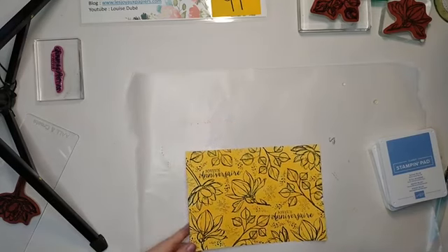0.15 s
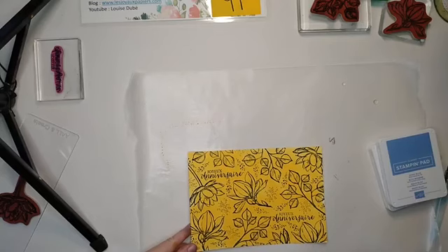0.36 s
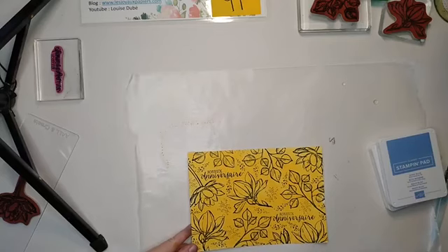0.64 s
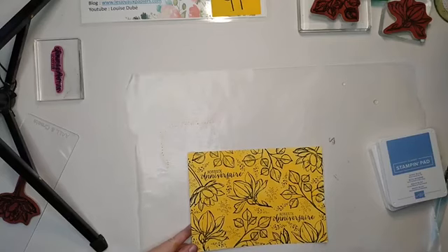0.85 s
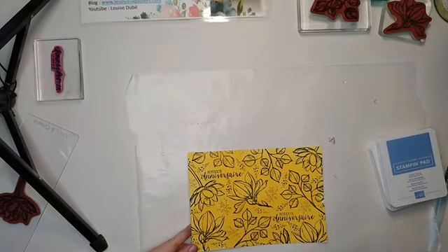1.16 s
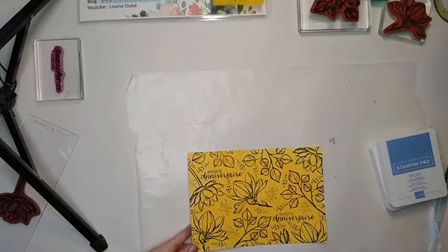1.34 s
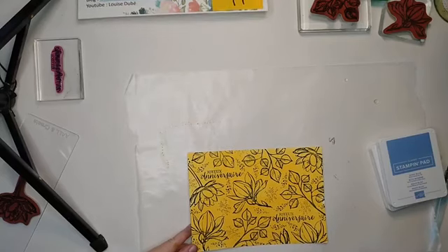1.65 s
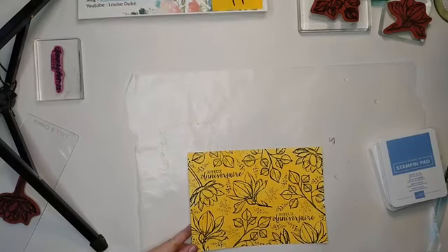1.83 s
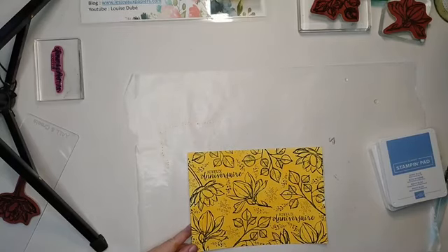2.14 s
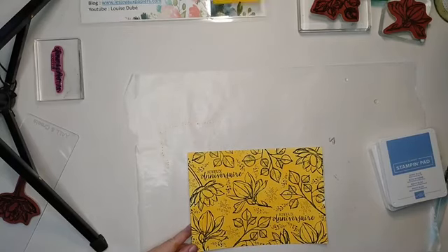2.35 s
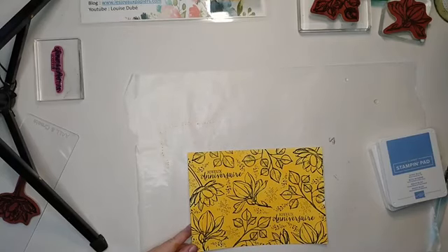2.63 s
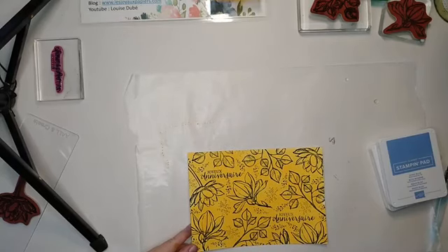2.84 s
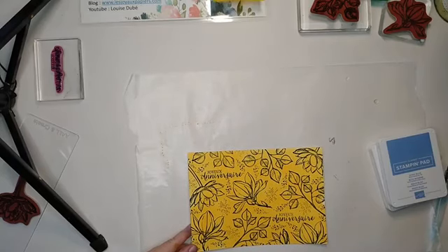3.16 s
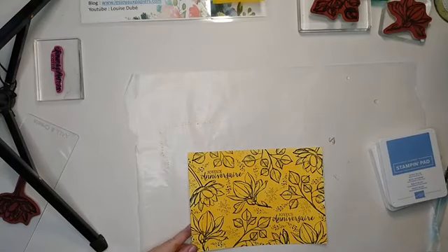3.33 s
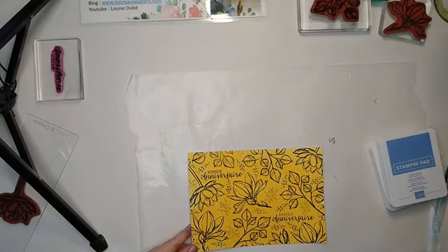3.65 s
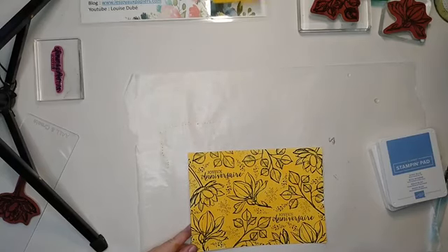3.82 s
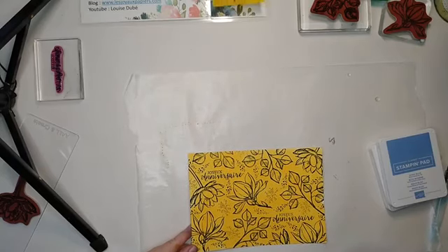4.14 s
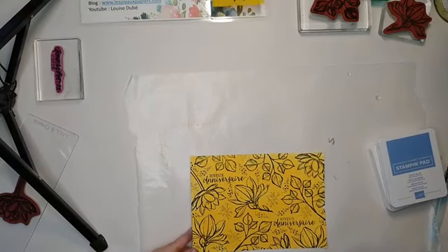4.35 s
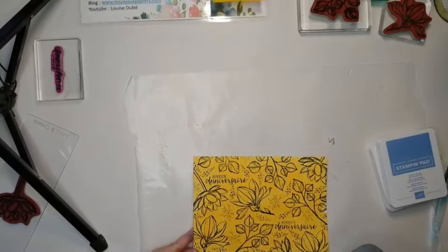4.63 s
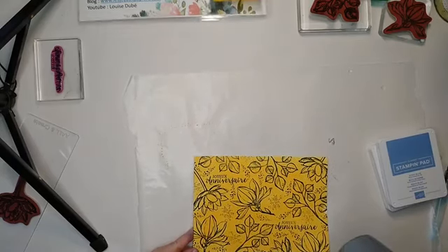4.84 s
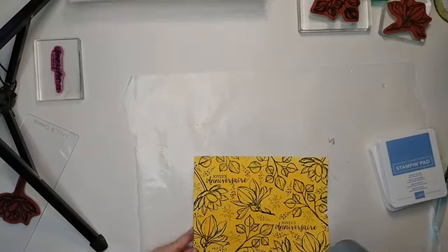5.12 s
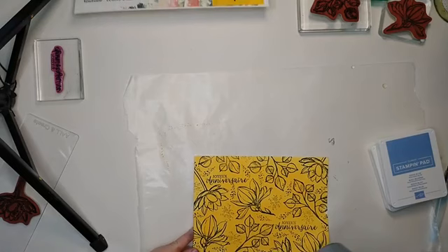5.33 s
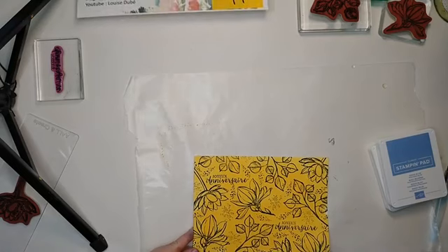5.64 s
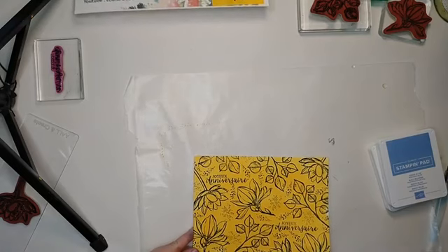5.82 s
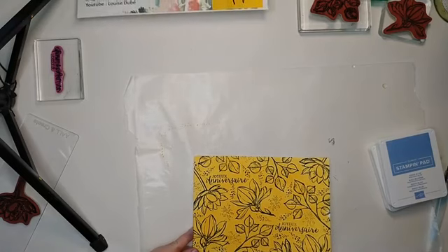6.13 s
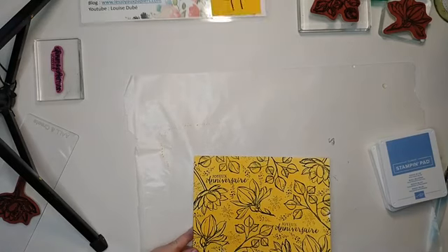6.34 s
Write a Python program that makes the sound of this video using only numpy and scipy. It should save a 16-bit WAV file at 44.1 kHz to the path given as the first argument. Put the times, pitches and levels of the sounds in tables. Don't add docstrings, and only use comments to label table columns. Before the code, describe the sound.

A crisp double click of a hard plastic switch breaks near silence over a craft table. A handheld heat blower immediately winds up, its dull breath brightening into a loud, noisy midrange rush with a nasal ringing barrel. It holds steady for several seconds, slowly weakening as noise reduction works. Then the level drops abruptly to a thinner, bubbly hiss that fades slightly without switching off. Mono, band-limited camera microphone, little room echo.

```python
import sys
import numpy as np
from scipy import signal
from scipy.fft import rfft, irfft
from scipy.io import wavfile
from scipy.ndimage import uniform_filter1d

SR = 44100
rng = np.random.default_rng(int(sys.argv[2]) if len(sys.argv) > 2 else 0)


def invert_db(x):
    u = np.asarray(x, float) / 20
    return 10 ** u


def wav_record(signal):
    frames = np.transpose(np.atleast_2d(signal))
    bounded = np.clip(frames, -1, 1)
    quanta = np.round(bounded * 32767).astype(np.int16)
    wavfile.write(sys.argv[1], SR, quanta)


N = 285761

# [multiple of shaft speed, level/dB against the rush, wobble/dB]
ROTOR_TONES = [
    (1, -34, 2.5),
    (4, -29.5, 1.2),
    (6, -31, 3),
    (12, -28, 1.5),
]
# [f/Hz, level/dB per Hz]
AIR_COLOUR = [(15, -80), (25, -55.5), (129, -22.5), (467, -18), (566, -9.5), (739, -11), (897, -7),
              (1040, -3.5), (1450, -5.5), (2250, -6.5), (2860, -11.5), (3470, -7), (4320, -18),
              (7010, -13.5), (8100, -31.5), (10500, -69.5), (17800, -120)]
# [f/Hz, width/Hz, lift/dB]
BARREL_MODES = [(574, 88, 3.5), (707, 68, 3), (753, 45, -2.5), (897.4, 59, 10.5), (983, 25, 7),
                (1033, 16, 7), (1060, 31, -6.5), (1113, 53, 2.5), (1187, 83, 3.5), (1301, 37, 6.5),
                (1405, 88, -2), (1466, 15, 0.5), (1585, 45, 2), (1750, 54, 2), (1860, 73, 2),
                (2223, 160, 4), (2326, 77, 2), (2480, 85, 7), (2950, 270, 1.5), (3350, 78, 2.5),
                (3580, 200, -0.5), (4140, 170, 4.5), (4550, 88, 6.5), (5040, 200, 1), (6060, 170, 0.5),
                (6700, 140, -4.5), (7610, 430, 6), (6950, 81, -2), (6370, 110, -2.5)]
# [f/Hz, width/Hz, lift/dB]
HOUSING_MODES = [(1130, 220, 17), (1361, 80, -10), (2490, 80, 9), (2722, 150, 9)]
# [from t/s, low f/Hz, high f/Hz, depth/dB]
LEARNT_BANDS = [(2.85, 20, 797, -6.5), (3.0, 1060, 1143, -4), (3.3, 3405, 3530, -3.5),
                (3.55, 1088, 1255, -10.5), (3.45, 1422, 1575, -10.5), (4.3, 780, 909, -5),
                (4.65, 810, 1040, -6), (4.85, 943, 1070, -4), (5.9, 1250, 1450, -2.5),
                (4.83, 1240, 1414, -7.5), (4.83, 1638, 6460, -6.5), (5.0, 7050, 7400, -2.5),
                (5.0, 7750, 8740, -5), (5.45, 2690, 2780, -6.5), (5.85, 6450, 7700, -4.5)]
# [from t/s, to t/s, f/Hz, width/Hz, lift/dB]
PASSING_MODES = [(2.85, 4.048, 735, 192, -4.5), (2.85, 3.392, 320, 200, 3), (2.846, 3.3, 5990, 252, -8.5),
                 (3.198, 3.598, 4560, 150, -6.5), (3.55, 4.05, 2250, 150, -7.5), (4.0, 5.2, 1572, 162, -6),
                 (3.604, 4.83, 2650, 120, 4), (5.1, 5.502, 6160, 200, 7.5), (5.5, 5.85, 6530, 200, -4.5),
                 (3.497, 4.83, 2870, 2540, 1), (3.911, 5.852, 7090, 1235, 5), (3.752, 5.845, 4315, 281, 7.5),
                 (4.755, 5.843, 705, 54.7, 15.5), (4.824, 5.846, 4310, 278, 8.5),
                 (4.83, 5.398, 2680, 90.7, 9), (4.835, 5.702, 1755, 179, 5), (4.828, 7, 2300, 190, 4.5),
                 (4.598, 7, 3960, 399, 3), (4.902, 5.7, 4930, 543, 4), (5.254, 5.8, 2470, 90, 8.5),
                 (5.4, 7, 3555, 250, 5), (5.438, 7, 1166, 167, 6.5), (5.9, 7, 1535, 199, 3),
                 (5.9, 7, 4550, 100, 5)]
# [t/s, f/Hz, lift/dB]
REDUCER_LAPSES = [(4.915, 2250, 6), (4.94, 900, 7), (5.545, 2480, 6), (6.03, 900, 6), (6.05, 2350, 6),
                  (6.112, 910, 16), (6.112, 2200, 10), (6.14, 910, 12), (6.18, 910, 13), (6.16, 3450, 8),
                  (6.18, 1150, 10), (6.18, 2350, 11), (6.3, 900, 7), (6.36, 1150, 10)]
# [start t/s, end t/s, f/Hz, width/Hz, level/dB]
BRUSH_HISS = (.385, .56, 5300, 120, -70)
# [t/s, peak level/dB, time to fall 60 dB/s]
SWITCH_CRACKS = [
    (.2029, -74, .01),
    (.267, -62, .03),
    (.272, -52, .02),
    (.2755, -22, .011),
    (.2772, -21, .012),
    (.2815, -36, .025),
    (.4334, -50, .008),
]
# [f/Hz, level/dB per Hz]
SWITCH_COLOUR = [(120, -86), (200, -64), (885, -14), (2040, -13.5), (2960, -4), (5090, -4), (5850, -11),
                 (7270, -4.5), (8100, -27), (10500, -55), (17800, -120)]
# [f/Hz, level/dB per Hz]
PAPER_COLOUR = [(180, -37), (300, -10.5), (535, -11.5), (929, -7.5), (1780, -11.5), (3000, 1.5), (4420, -4),
                (7060, -2), (8100, -14.5), (10500, -45), (17800, -120)]
# [f/Hz, level/dB per Hz]
HUM_COLOUR = [(15, -57.5), (25, -18), (91, 5.5), (145, -9.5), (492, -23), (669, -17.5), (1000, -19.5),
              (1300, -48), (2200, -120)]

TOP_SPEED_HZ = 227.2
CLAMP_S = 4.83
FRAMES = dict(fs=SR, nperseg=1024, noverlap=768)


def dryer(t):
    hz, s, air = signal.stft(rng.standard_normal(N), **FRAMES)
    tones = signal.stft(rotor(t), **FRAMES)[2]

    slow = np.maximum(np.log2(shaft(s) / TOP_SPEED_HZ), -1.5)
    tilt = invert_db(2.8 * np.outer(np.log2(hz / 900 + 0.092), slow))
    flutter_db = 0.72 * patches(air.shape, 3, 14) + 0.39 * patches(air.shape, 60, 2)
    housing = invert_db(modes_db(HOUSING_MODES, hz)[:, None] + 4 * slow)
    raw = (air * invert_db(flutter_db) + tones * housing) * tilt

    shift_db = band_shift_db(hz, s)
    power = uniform_filter1d(np.abs(raw / tilt) ** 2, size=6, axis=1)
    excess_db = 10 * np.log10(power / np.mean(np.abs(air) ** 2))
    gain = invert_db(shift_db + leak_db(shift_db, excess_db) + lapse_db(hz, s))

    body = invert_db(rush_db(hz))[:, None]
    heard = np.sqrt(np.mean((body * tilt * invert_db(shift_db)) ** 2, axis=0))
    heard = uniform_filter1d(heard, size=5)
    rush = signal.istft(raw * gain / heard, **FRAMES)[1][:N]

    fine_hz = np.fft.rfftfreq(N, 1 / SR)
    rush = irfft(rfft(rush) * invert_db(rush_db(fine_hz) + ripple_db(fine_hz)), N)
    return rush * invert_db(loudness_db(t) - 1) * window(t, 0.1, 9, .02)


def rotor(t):
    turns = np.cumsum(shaft(t)) / SR
    hop = 441
    wander = patches((len(ROTOR_TONES), N // hop + 1), 1, 12)
    tones = np.zeros(N)
    for (order, db, wobble_db), w in zip(ROTOR_TONES, wander):
        level = invert_db(db + wobble_db * np.repeat(w, hop)[:N])
        tones += level * np.sin(2 * np.pi * round(order) * turns)
    return np.sqrt(2) * tones


def shaft(t):
    on_s, spin_up_s = .27, .375
    fastest_s, droop_hz_per_s2 = 4.1, .15
    spin_up = 1 - np.exp(-np.maximum(t - on_s, .01) / spin_up_s)
    droop = droop_hz_per_s2 * np.clip(t - fastest_s, -1.5, 3) ** 2
    return TOP_SPEED_HZ * spin_up - droop


def loudness_db(t):
    rush_level_db, speed_power, air_lag_s = -22.5, 2.66, .022
    drift_db_per_s = -0.64
    clamp_drop_db, fade_from_s, fade_db_per_s = -5, 5.61, -4
    spin_db = 20 * speed_power * np.log10(shaft(t - air_lag_s) / TOP_SPEED_HZ)
    drift_db = drift_db_per_s * np.clip(t - 2, 0, CLAMP_S - 2)
    clamp_db = clamp_drop_db * window(t, CLAMP_S, 99, .015)
    fade_db = fade_db_per_s * np.maximum(t - fade_from_s, 0)
    return rush_level_db + spin_db + drift_db + clamp_db + fade_db


def rush_db(hz):
    return shape_db(AIR_COLOUR, hz) + modes_db(BARREL_MODES, hz)


def ripple_db(hz):
    ripple = 1.1 * np.repeat(patches((1200, 1), 2, 1), N // 2400 + 1)[:len(hz)]
    ripple = ripple * np.clip(hz / 1500 - .7, 0, 1)
    return uniform_filter1d(ripple, size=60)


def band_shift_db(hz, s):
    settle_s, edge_hz = .025, 22.0
    shift = np.zeros((len(hz), len(s)))
    for start, low, high, db in LEARNT_BANDS:
        shift += db * np.outer(window(hz, low, high, edge_hz), window(s, start, 99, settle_s))
    for start, end, f, width, db in PASSING_MODES:
        band = window(hz, f - width / 2, f + width / 2, edge_hz)
        shift += db * np.outer(band, window(s, start, end, settle_s))
    return shift


def leak_db(shift_db, excess_db):
    ducked = uniform_filter1d(np.clip(-shift_db / 5, 0, 1), 25, axis=0)
    brief = .6 * patches(shift_db.shape, 20, 2)
    ridges = 1.7 * patches(shift_db.shape, 2, 20)
    return ducked * (.9 * np.clip(excess_db, -5., 6.) + brief + ridges - 1.2)


def lapse_db(hz, s):
    width_hz, long_s = 80, .016
    lift = np.zeros((len(hz), len(s)))
    for at, f, db in REDUCER_LAPSES:
        band = np.exp(-((hz - f) / width_hz) ** 2)
        lift += db * np.outer(band, np.exp(-((s - at) / long_s) ** 2))
    return lift


def brushes(t):
    start, end, hz, width, db = BRUSH_HISS
    band = signal.butter(2, [hz - width / 2, hz + width / 2], "band", fs=SR, output="sos")
    hiss = signal.sosfilt(band, rng.standard_normal(N))
    return invert_db(db) * hiss / np.std(hiss) * window(t, start, end, .008)


def switch(t):
    crack = coloured(rng.standard_normal(N), SWITCH_COLOUR)
    tail = coloured(rng.standard_normal(N), SWITCH_COLOUR)
    snaps = np.zeros(N)
    for at, db, t60 in SWITCH_CRACKS:
        age = np.maximum(t - at, 0)
        rise = 1 - np.exp(-age / .0003)
        direct = crack * invert_db(-60 * age / t60)
        echo = invert_db(-24.) * tail * invert_db(-60 * age / .21)
        snaps += invert_db(db) * rise * (direct + echo)
    return snaps


def rustle(t):
    start_db, fall_db_per_s, gate_s, gated_db = -60.5, -200, .04, -85
    level = invert_db(start_db + fall_db_per_s * t) * window(t, -1, gate_s, .002) + invert_db(gated_db)
    return coloured(rng.standard_normal(N), PAPER_COLOUR) * level


def finger_slide(t):
    at_s, long_s, level_db = .12, .07, -80
    colour = [(400, -22), (1400, -16), (2000, -5), (2500, -1), (2900, -10), (5000, -16), (8000, -30)]
    swell = np.exp(-((t - at_s) / long_s) ** 2)
    return coloured(rng.standard_normal(N), colour) * invert_db(level_db) * swell


def room_hum():
    return invert_db(-83) * coloured(rng.standard_normal(N), HUM_COLOUR)


def shape_db(points, hz):
    f, db = np.transpose(points)
    return np.interp(np.log(hz + 1), np.log(f), db)


def modes_db(table, hz):
    return sum(db / (1 + (2 * (hz - f) / width) ** 2) for f, width, db in table)


def coloured(x, points):
    colour = invert_db(shape_db(points, np.fft.rfftfreq(len(x), 1 / SR)))
    y = irfft(rfft(x) * colour, len(x))
    return y / np.std(y)


def patches(shape, wide, long):
    z = rng.standard_normal(shape)
    for _ in range(2):
        z = uniform_filter1d(z, wide, axis=0)
        z = uniform_filter1d(z, long, axis=1)
    return z / np.std(z)


def window(at, start, end, soft):
    return (np.tanh((at - start) / soft) - np.tanh((at - end) / soft)) / 2


def scene():
    t = np.arange(N) / SR
    mono = dryer(t) + brushes(t) + switch(t) + rustle(t) + finger_slide(t) + room_hum()
    return np.tile(mono, (2, 1))


def top_cut(x):
    return signal.sosfilt(signal.butter(12, 14650, fs=SR, output="sos"), x)


def record(dry):
    null = signal.tf2sos(*signal.iirnotch(8000, 60, fs=SR))
    top = signal.ellip(10, .1, 80, 8180, fs=SR, output="sos")
    hiss_colour = [(9500, -30.5), (11500, -6), (13500, 0), (14600, -3), (15200, -40)]
    hiss = invert_db(-97.5) * coloured(rng.standard_normal(N), hiss_colour)
    captured = signal.sosfilt(np.vstack([null, top]), dry)
    return top_cut(captured + hiss)


dry = scene()
out = record(dry)
wav_record(out)
```